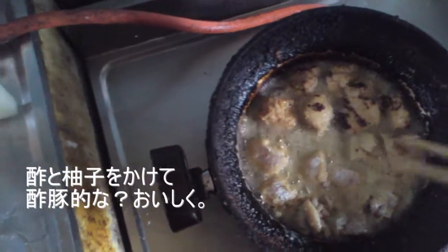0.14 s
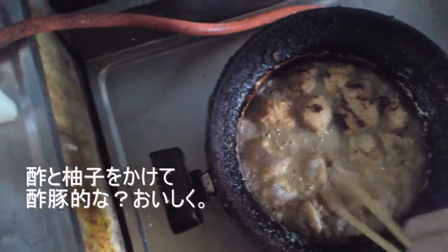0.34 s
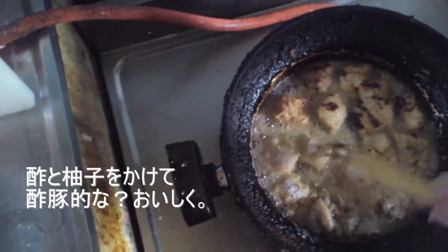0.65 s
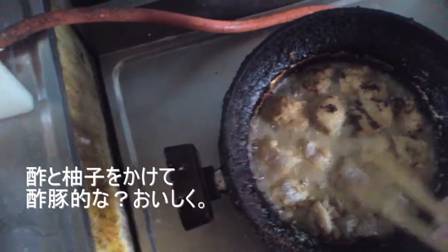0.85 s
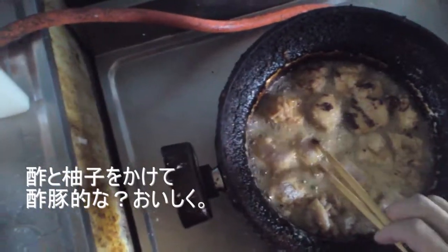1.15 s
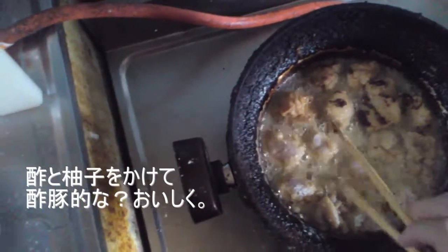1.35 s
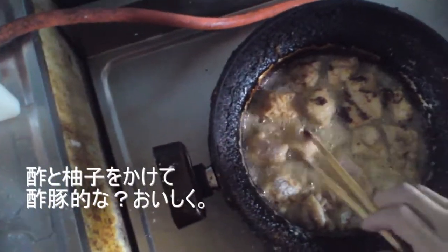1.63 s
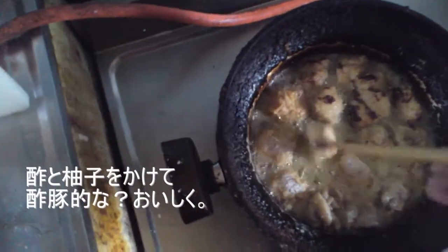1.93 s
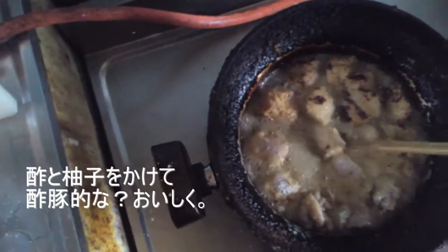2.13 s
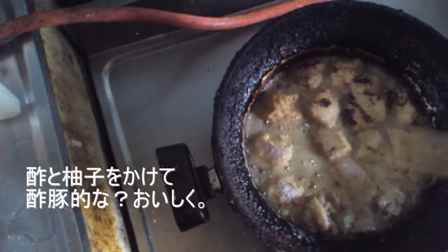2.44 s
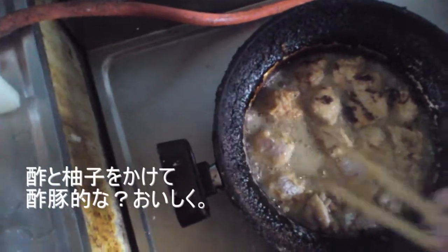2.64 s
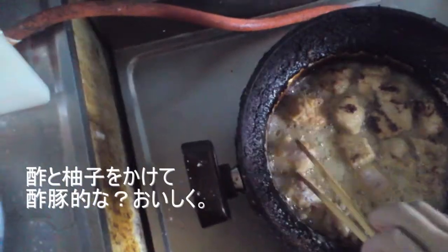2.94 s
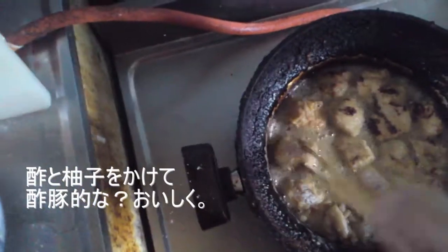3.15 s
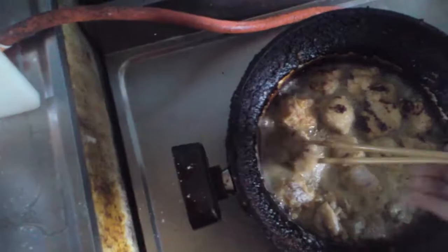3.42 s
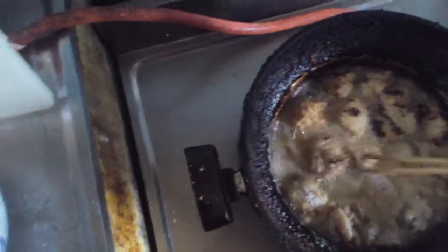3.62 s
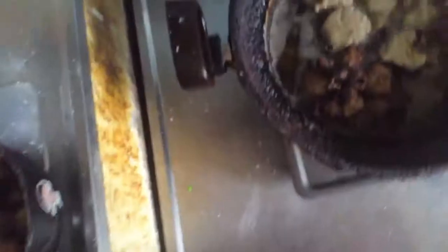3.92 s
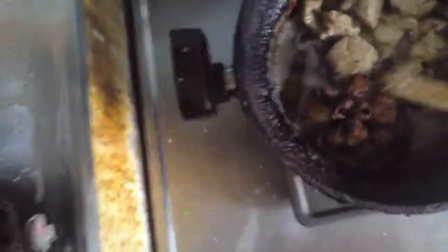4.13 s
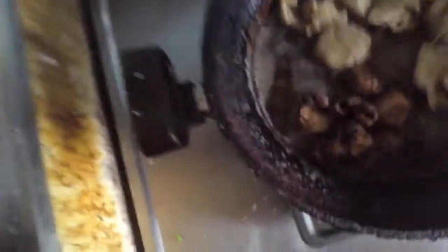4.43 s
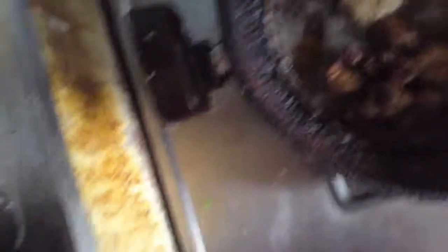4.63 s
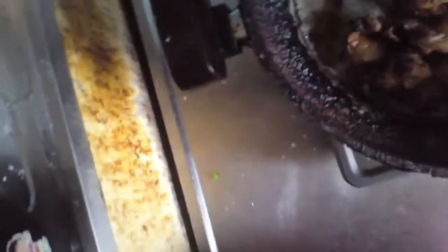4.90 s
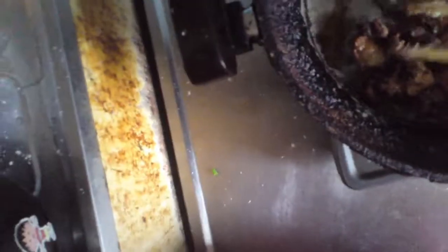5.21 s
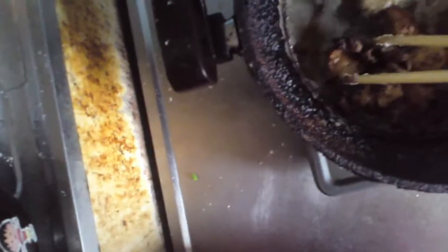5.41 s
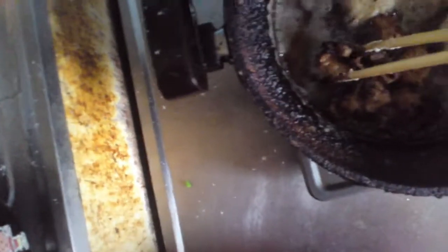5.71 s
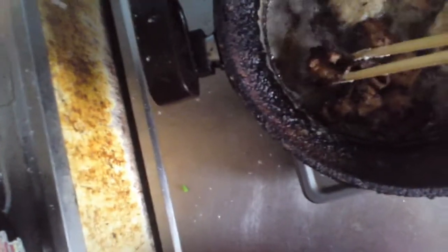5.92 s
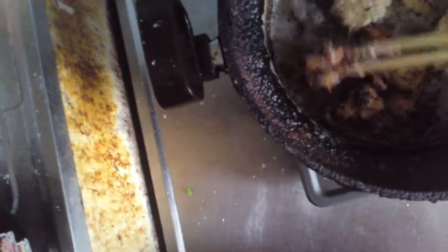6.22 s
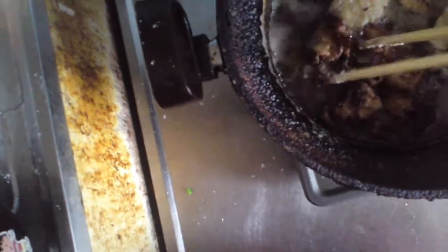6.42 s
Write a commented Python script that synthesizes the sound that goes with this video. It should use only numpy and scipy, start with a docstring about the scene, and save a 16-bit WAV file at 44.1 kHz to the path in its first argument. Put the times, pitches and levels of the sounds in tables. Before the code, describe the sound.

Chicken pieces deep-fry in a small iron pot on a kitchen stove, giving a dense, even sizzle. Wooden chopsticks turn the pieces with soft knocks, plops and dull thuds over a faint low rumble. The sound cuts to silence for about half a second. The frying then returns closer to the microphone and livelier, with fine crackling, a few dry cracks and sharp little pops of water in the oil.

```python
"""Chicken deep-fries in a small iron pot on a kitchen hob: countless tiny steam bubbles, each a damped
oscillator, add up to an even sizzle coloured by the air resonances of the pot. Wooden chopsticks turn
the pieces with soft bumps over a low rumble. After half a second of silence the pot is nearer and
livelier: the crusts crackle like crinkled plastic and single water drops flash to steam and pop."""
import sys
import numpy as np
from scipy import signal
from scipy.fft import rfft, irfft
from scipy.io import wavfile

SR = 44100
rng = np.random.default_rng(int(sys.argv[2]) if len(sys.argv) > 2 else 0)


def put_to_file(sound):
    """Save the sound as 16-bit audio at rate SR, in the file named by the first command-line argument."""
    columns = np.atleast_2d(sound).T  # one column per channel
    safe = np.clip(columns, -1, 1)
    whole_steps = np.round(safe * 32767)
    wavfile.write(sys.argv[1], SR, whole_steps.astype(np.int16))


N = 289296
TIME, HZ = np.arange(N) / SR, np.fft.rfftfreq(4096, 1 / SR)
FAR_END_S, NEAR_START_S = 3.915, 4.471

# Spectral envelopes: f/Hz, relative level/dB
RUMBLE_SPECTRUM = [(10, -15), (28, 6.5), (45, 0), (65, 0), (90, -0.5), (130, -1.5), (200, -5.5),
                   (300, -10.5), (600, -16.5), (2000, -57)]
WIDTH_SPECTRUM = [(60, -18.5), (300, -3), (1000, -3.5), (1900, 6), (3000, 11.5), (4000, -33.5), (9000, -51)]
SIMMER_SPECTRUM = [(100, -19.5), (300, -12), (500, -9.5), (800, -12.5), (1100, -11), (1600, -9.5),
                   (2500, -4.5), (3100, -5.5), (4200, -2.5), (5500, -2), (7000, -.5), (9000, .5)]
FIZZ_SPECTRUM = [(100, -36.5), (400, -15), (1500, -13.5), (3000, -3.5), (4200, 0.5), (6000, 0.5), (9000, 3)]
CRACKLE_SPECTRUM = [(100, -42), (400, -11), (520, -9.5), (620, -6.5), (900, -4), (1050, -8), (1650, -6),
                    (2200, -1), (3000, -2), (4000, -2.5), (5200, -5), (9000, -13.5)]
# Air resonances of the pot and the hob recess: f/Hz, bandwidth/Hz, gain/dB
FAR_MODES = [(449, 31, 4.5), (965, 93, 5), (1192, 92, 7.5), (1362, 72, 6), (1740, 36, 4.5), (2640, 86, 1.5),
             (3660, 520, 5), (4300, 130, 1.8)]
NEAR_MODES = [(598.3, 16, 10), (735, 60, 4.3), (930, 26, 6), (1310, 230, 4.2), (1530, 54, 1.4),
              (2280, 390, 2), (3820, 530, 2.7)]
# Rumble, stronger while the hands move: t/s, level/dB
RUMBLE_LEVELS = [(0, -56), (2.2, -55), (2.5, -51), (2.68, -53), (3.0, -52), (3.1, -56), (3.45, -54.5),
                 (3.6, -53), (3.9, -51.5), (4.5, -56.5), (6.55, -55.5)]
# Dull thuds of handling: t/s, level/dB, f/Hz
HANDLING_THUDS = [(2.343, -38, 100), (2.534, -36.5, 150), (2.553, -34.5, 130), (2.805, -37.5, 150),
                  (2.834, -31, 62), (3.007, -40, 180), (3.553, -40, 90), (6.506, -36.5, 165)]
# Soft chopstick knocks and, higher in pitch, plops of large bubbles in the oil: t/s, level/dB, f/Hz
KNOCKS_AND_PLOPS = [(0.475, -36, 475), (1.065, -34, 600), (1.087, -39, 510), (1.537, -36, 880),
                    (2.393, -37, 560), (2.463, -36.5, 500), (2.506, -37, 545), (2.539, -38, 560),
                    (2.555, -34.5, 515), (2.822, -39, 500), (5.170, -28.5, 810)]
# Dry cracks of the crust: t/s, relative level/dB
CRUST_CRACKS = [(4.476, -24), (4.942, -27), (5.187, -26), (5.763, -23.5), (6.4486, -15.5), (6.465, -25)]
# The largest water drops bursting in the oil: t/s, level/dB, f/Hz
LARGE_DROPS = [(4.477, -23.5, 3960), (4.509, -24, 3900), (4.593, -24, 3450), (4.599, -20, 3740),
               (4.649, -20, 2480), (4.694, -24, 3580), (4.729, -23.5, 2670), (4.762, -18.5, 3190),
               (4.896, -24, 2080), (4.909, -18, 3490), (5.050, -22, 3600), (5.422, -23.5, 2240),
               (5.463, -19.5, 2400), (5.481, -28, 2540), (6.007, -26.5, 2890), (6.094, -26.5, 2585),
               (6.252, -26, 2720)]
# Course of the lively frying: t/s, relative fizz level/dB, relative crackle level/dB
BOIL_LEVELS = [(4.48, -34.5, -30.5), (4.7, -34, -33), (4.78, -36.5, -33.5), (5.06, -37, -35.5),
               (5.18, -35.5, -32.5), (5.35, -37, -36.5), (5.47, -34.5, -36.5), (5.6, -38.5, -36),
               (5.7, -33, -36), (5.8, -37, -36), (5.9, -35.5, -33), (6.02, -36, -38.5), (6.1, -36, -35),
               (6.24, -40, -37), (6.37, -34, -35.5), (6.46, -34, -35), (6.54, -36.5, -36.5)]


def amp(db):
    """Amplitude ratio of a level in decibels."""
    return 10 ** (np.asarray(db) / 20)


def unit(x):
    """Normalisation to rms 1."""
    return x / np.sqrt(np.mean(x ** 2) + 1e-20)


def envelope(rows, column=1):
    """Amplitude envelope, interpolated linearly in decibels."""
    rows = np.array(rows)
    return amp(np.interp(TIME, rows[:, 0], rows[:, column]))


def add(mix, start_s, sound):
    """Superposition of a sound on the mix."""
    part = mix[round(start_s * SR):][:len(sound)]
    part += sound[:len(part)]


def wander(hz):
    """Random modulation of rms 1: noise that rolls off above hz."""
    f = np.fft.rfftfreq(N, 1 / SR)
    return unit(irfft(rfft(rng.standard_normal(N)) * (f / hz) ** .5 / (1 + (f / hz) ** 4), N))


def colour(x, spectrum, modes=()):
    """Minimum-phase filtering by a spectral envelope with resonance peaks; rms 1 out."""
    f, db = np.transpose(spectrum)
    db = np.interp(np.log(HZ + 1), np.log(f), db)
    for hz, width, lift_db in modes:
        db = db + lift_db / (1 + (2 * (HZ - hz) / width) ** 2)
    log_gain = np.log(amp(np.r_[db, db[-2:0:-1]]))
    response = np.fft.ifft(np.exp(np.conj(signal.hilbert(log_gain)))).real
    return unit(signal.oaconvolve(x, response[:len(HZ)])[:N])


def impulses(per_s, spread_db):
    """Poisson process: clicks of either sign, their levels from a capped exponential distribution."""
    occurs = rng.random(N) < per_s / SR
    size = np.minimum(rng.exponential(1, N), 2 * np.e - 1)
    return occurs * amp(spread_db * size) * rng.choice([-1, 1], N)


def echoes(x, t60):
    """Reverberation: dense reflections fall by 60 dB in t60 seconds."""
    t = TIME[:SR // 8]
    tail = rng.standard_normal(len(t)) * amp(-60 * t / t60) * (t > .001)
    return unit(signal.oaconvolve(x, tail)[:len(x)]) * np.std(x)


def snap(decay_s):
    """Sudden release radiates a transient of bright, exponentially decaying noise."""
    t = TIME[:4096]
    highpass = signal.butter(2, 900, "high", fs=SR)
    return signal.lfilter(*highpass, rng.standard_normal(len(t))) * np.exp(-t / decay_s)


def stereo_width(pot):
    """Side signal: a faint, diffuse midrange difference between left and right."""
    return amp(-62.5) * colour(echoes(pot, t60=.12), WIDTH_SPECTRUM)


def rumble():
    """Low air and handling noise around the hob, made lumpy by slow amplitude modulation."""
    lumpy = rng.standard_normal(N) * amp(1.3 * wander(hz=6.5))
    return colour(lumpy, RUMBLE_SPECTRUM) * envelope(RUMBLE_LEVELS)


def bumps(rows, cycles, wet_db):
    """Heavy damping: a knock, plop or thud in the oil-filled pot dies away within a few cycles."""
    out, t = np.zeros(N), TIME[:4096]
    for start_s, db, hz in rows:
        bump = np.sin(2 * np.pi * hz * t) * np.exp(-hz * t / cycles)
        add(out, start_s, amp(db) * (bump + amp(wet_db) * echoes(bump, t60=.11)))
    return out


def crust_cracks():
    """Brittle fracture: the crust splits with a dulled snap that echoes but does not ring."""
    out, lowpass = np.zeros(N), signal.butter(1, 6500, fs=SR)
    for start_s, db in CRUST_CRACKS:
        crack = amp(db) * signal.lfilter(*lowpass, snap(decay_s=.0018))
        add(out, start_s, crack + amp(-8) * echoes(crack, t60=.04))
    return out


def crust_ticks(per_s, spread_db, t60, wet_db):
    """Incoherent addition: each tick comes from another spot, so the echoes sum in energy."""
    clicks = impulses(per_s, spread_db)
    retained = amp(-120 / (t60 * SR))  # share of the energy left after one sample
    energy = signal.lfilter([1 - retained], [1, -retained], clicks ** 2)
    haze = np.sqrt(energy) * rng.standard_normal(N)
    return unit(clicks + amp(wet_db) * haze)


def water_pops(small_per_s=9, ring_s=.002, bounce_s=.0024):
    """Flash boiling: a drop bursts with a snap, its cavity rings and the pot wall reflects the pulse."""
    out, t = np.zeros(N), TIME[:4096]
    moments = TIME[(rng.random(N) < small_per_s / SR) & (TIME > NEAR_START_S)]
    small_drops = [(s, -30.5 + 1.8 * rng.standard_normal(), rng.uniform(2400, 4080)) for s in moments]
    for start_s, db, hz in list(LARGE_DROPS) + small_drops:
        ring = np.sin(2 * np.pi * hz * t) * np.exp(-(t / ring_s) ** 2)
        pop = amp(db) * ring + amp(-35) * snap(decay_s=.00069)
        add(out, start_s, pop + amp(-5.5) * echoes(pop, t60=.077))
        add(out, start_s + bounce_s, amp(-20.5) * pop)
    return out


def bubbles(density, spread_db, cycles, wet_db, sizes=28):
    """Bubble resonance: each bursting bubble is a damped oscillator whose size sets its pitch."""
    t, out = TIME[:2048], np.zeros(N)
    for hz in np.geomspace(500, 9000, sizes):
        ring = np.sin(2 * np.pi * hz * t) * np.exp(-hz * t / cycles)
        ring = ring + amp(wet_db) * echoes(ring, t60=.038)
        share = hz / 90000  # small, high bubbles are the more numerous
        bursts = impulses(density * share, spread_db)
        out += np.sqrt(share) * unit(signal.oaconvolve(bursts, ring)[:N])
    return unit(out)


def simmer(start_db=-36.5, rise_db_per_s=.2156):
    """Superposed tiny bubbles merge into an even sizzle that grows slightly as the pieces are turned."""
    grains = bubbles(density=9000, spread_db=1.5, cycles=1.6, wet_db=-11, sizes=40)
    ticks = crust_ticks(per_s=900, spread_db=-1, t60=.022, wet_db=-3)
    steam = rng.standard_normal(N) + amp(2) * grains + amp(-7.5) * ticks
    steam *= amp(.31 * wander(hz=35))
    return colour(steam, SIMMER_SPECTRUM, FAR_MODES) * amp(start_db + rise_db_per_s * TIME)


def boil():
    """Common modulation: steam leaves the crusts in spurts that drive fine fizz and coarse crackle."""
    spurts = wander(hz=70)
    ticks = crust_ticks(per_s=650, spread_db=4, t60=.018, wet_db=-4)
    hiss = amp(-1) * rng.standard_normal(N)
    fizz = hiss + bubbles(density=4100, spread_db=3.5, cycles=3.5, wet_db=-5) + ticks
    crackle = bubbles(density=4600, spread_db=1.5, cycles=2.2, wet_db=-8) + amp(-4) * ticks
    fizz = colour(fizz * amp(spurts), FIZZ_SPECTRUM)
    crackle = colour(crackle * amp(1.1 * spurts), CRACKLE_SPECTRUM, NEAR_MODES)
    fizz *= amp(1.75) * envelope(BOIL_LEVELS, column=1)
    crackle *= amp(-4) * envelope(BOIL_LEVELS, column=2)
    return fizz + crackle


def scene():
    """Superposition of the sources, almost mono: far frying, silence, then near frying."""
    far, near = TIME < FAR_END_S, TIME > NEAR_START_S
    frying = simmer() * far + boil() * near + crust_cracks() + water_pops()
    knocks_and_plops = bumps(KNOCKS_AND_PLOPS, cycles=1.3, wet_db=-11)
    thuds = bumps(HANDLING_THUDS, cycles=.8, wet_db=-9)
    pot = frying + knocks_and_plops + thuds + rumble()
    side = stereo_width(pot * np.where(far, 1, amp(-4)))  # the left-right difference is 4 dB fainter in the near part
    return np.array([pot + side, pot - side]) * (far | near)


def record(dry):
    """Band limiting: a steep linear-phase low-pass at 9090 Hz."""
    lowpass = signal.firwin(1535, 9090, window=("kaiser", 9), fs=SR)
    return signal.oaconvolve(dry, lowpass[None], "same")


dry = scene()
out = record(dry)
put_to_file(out)
```